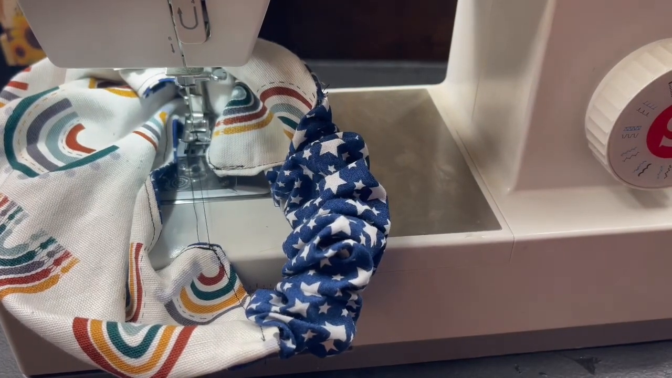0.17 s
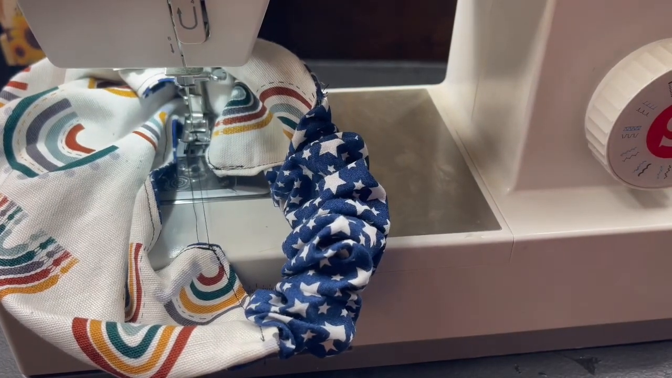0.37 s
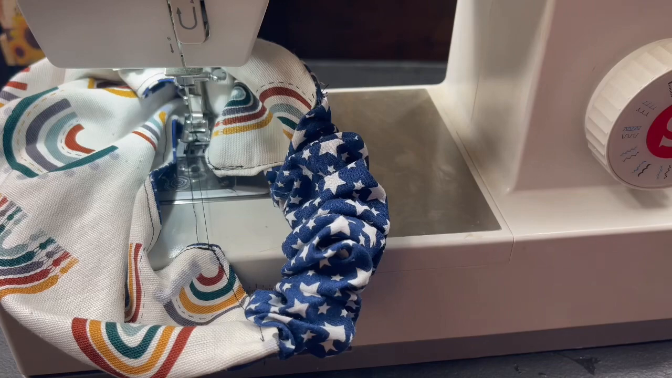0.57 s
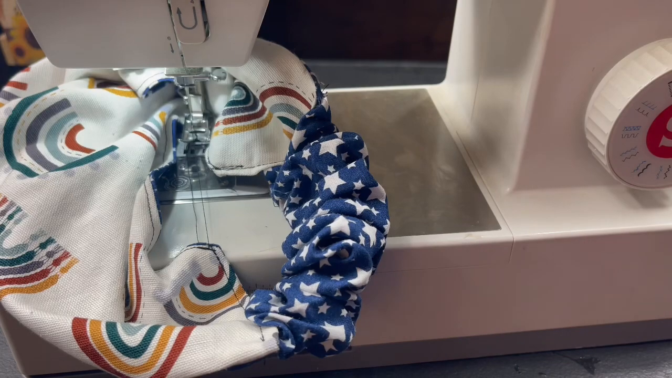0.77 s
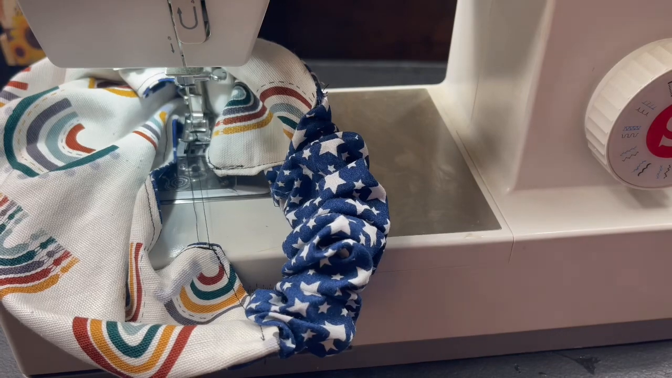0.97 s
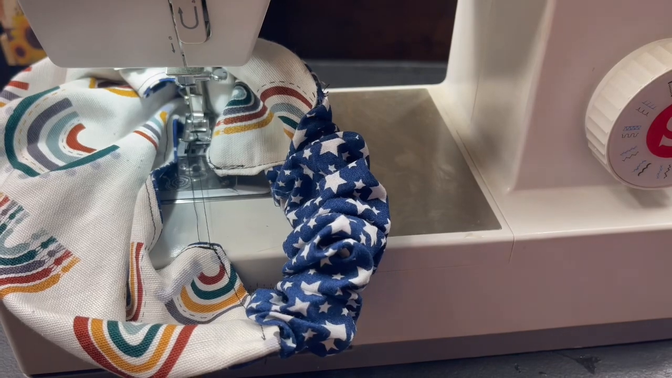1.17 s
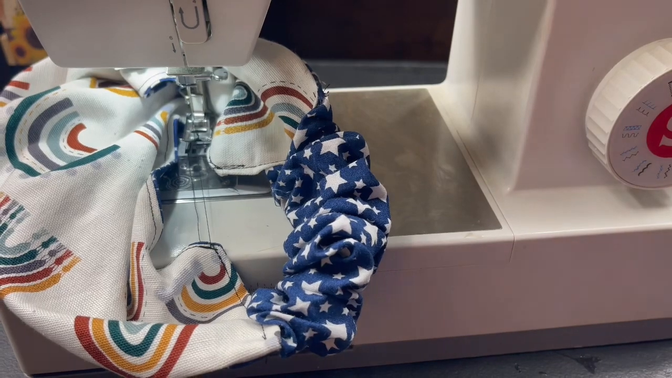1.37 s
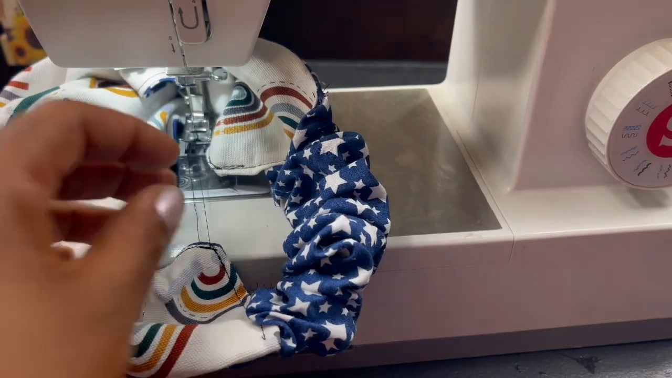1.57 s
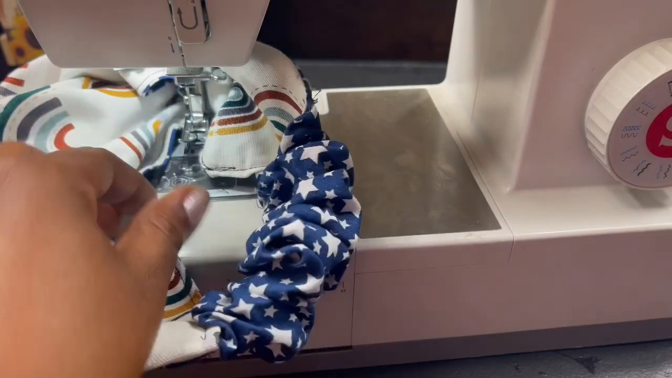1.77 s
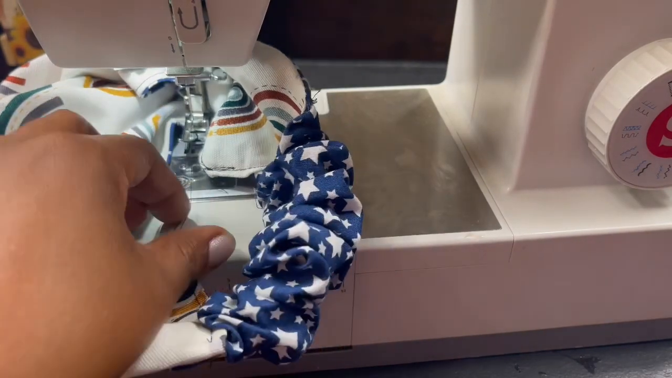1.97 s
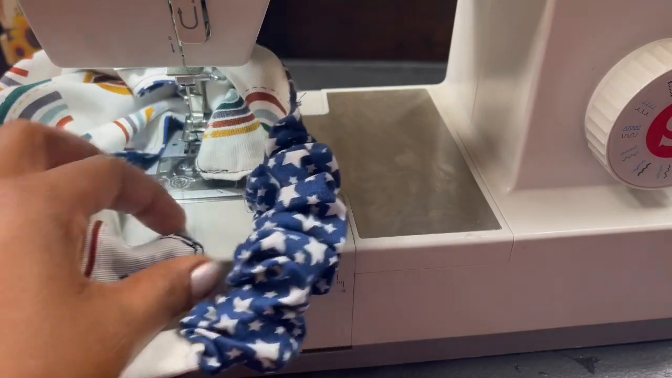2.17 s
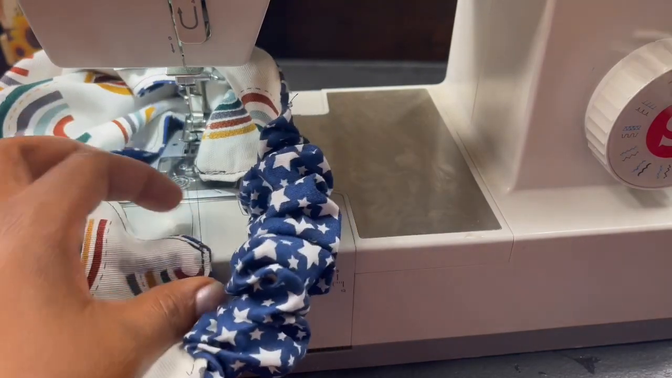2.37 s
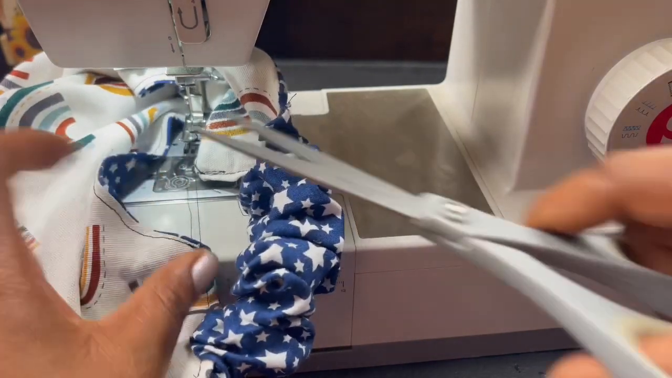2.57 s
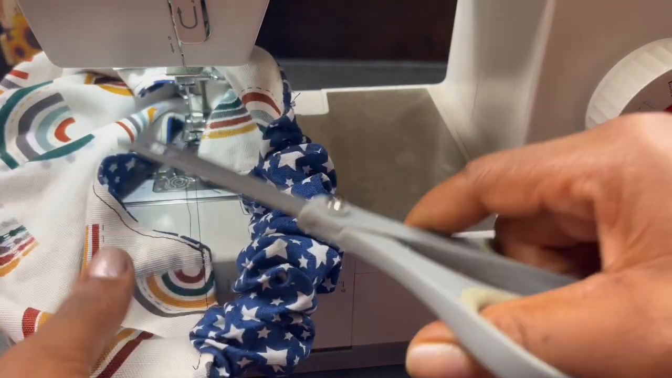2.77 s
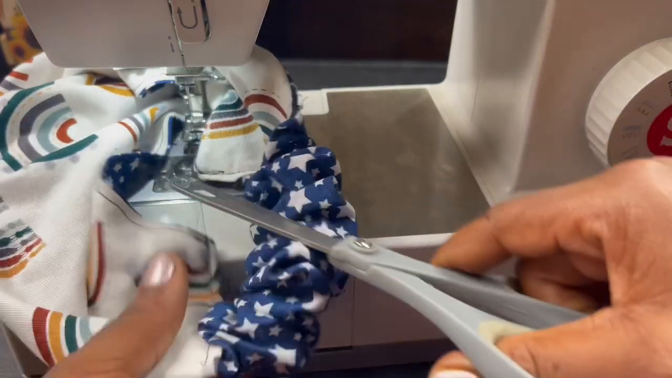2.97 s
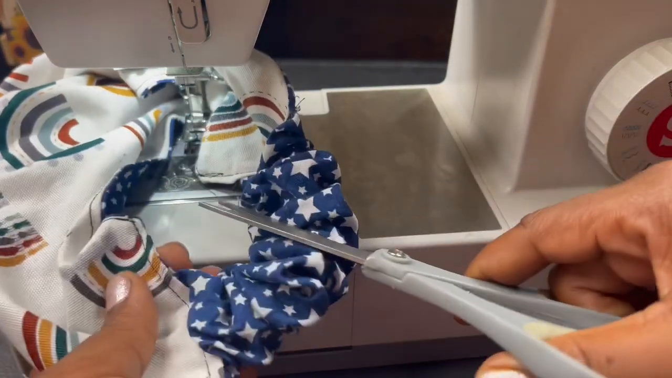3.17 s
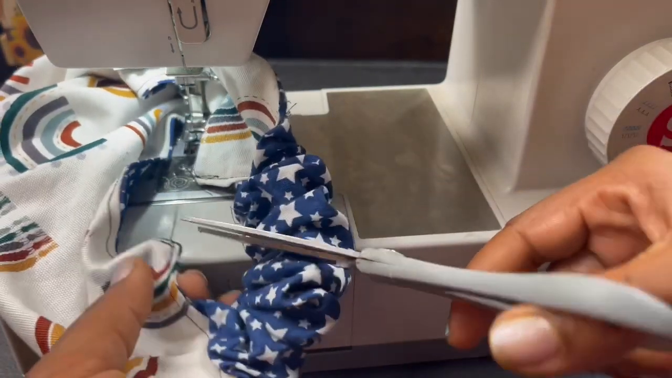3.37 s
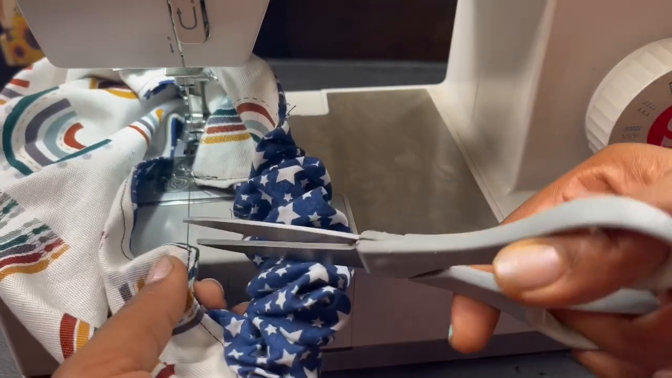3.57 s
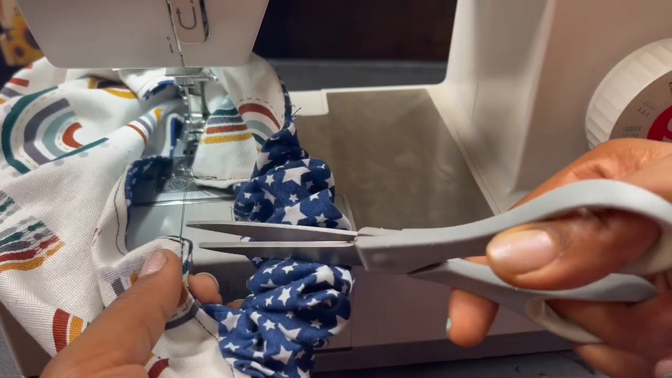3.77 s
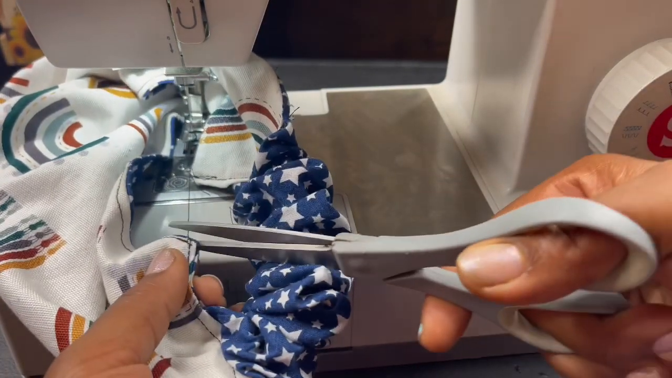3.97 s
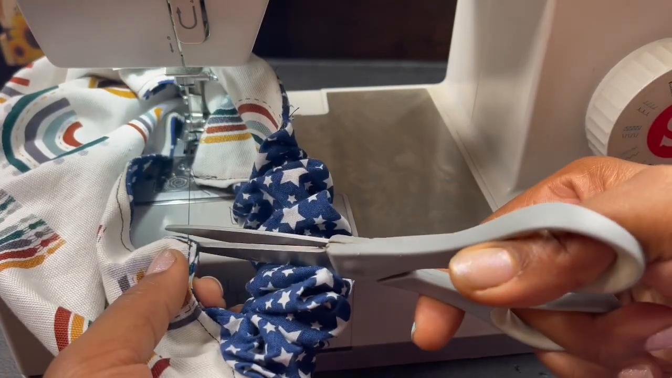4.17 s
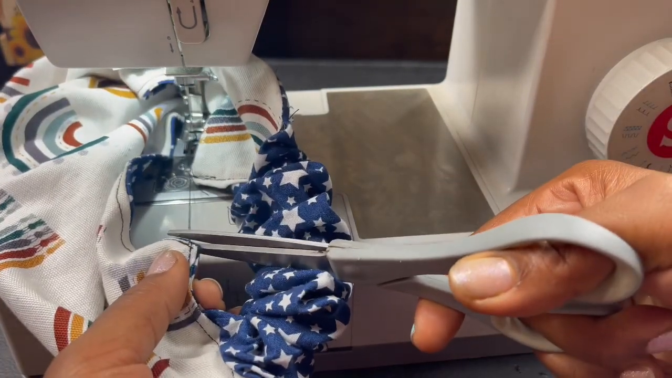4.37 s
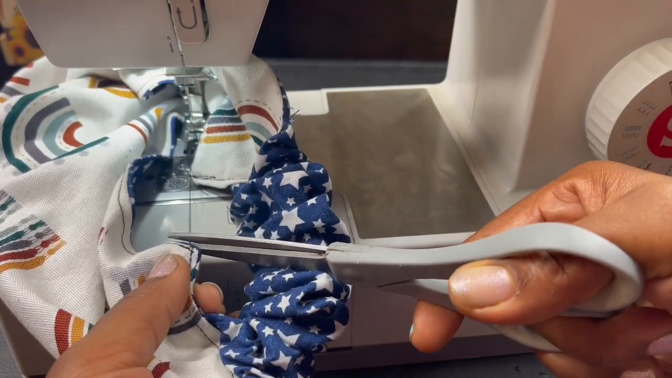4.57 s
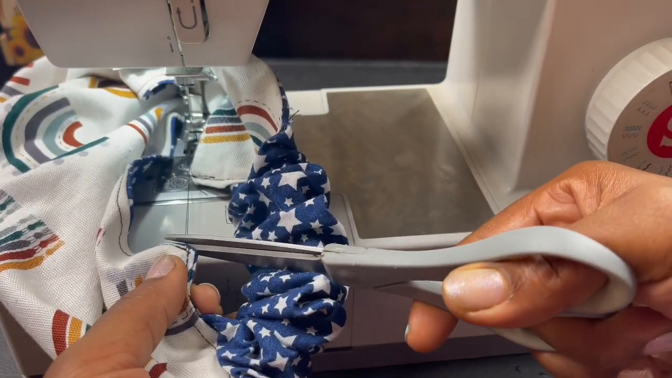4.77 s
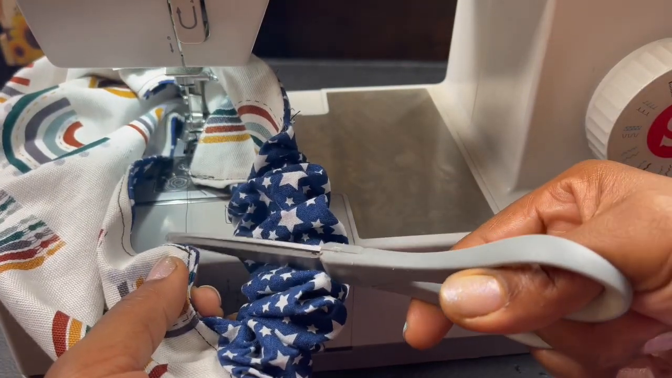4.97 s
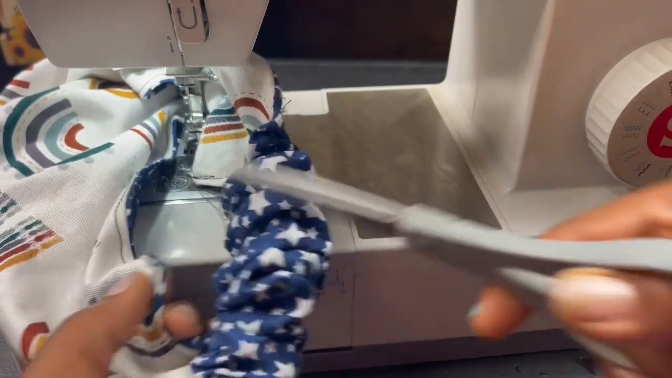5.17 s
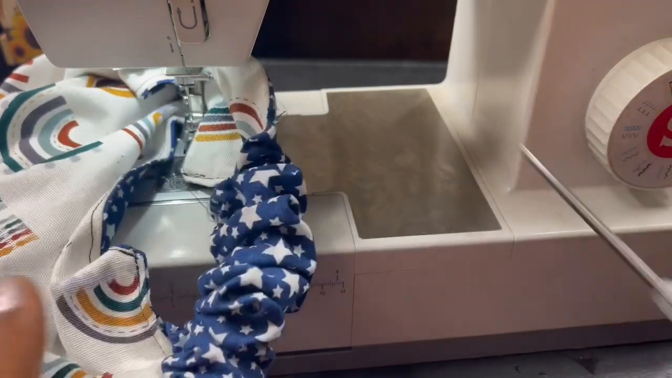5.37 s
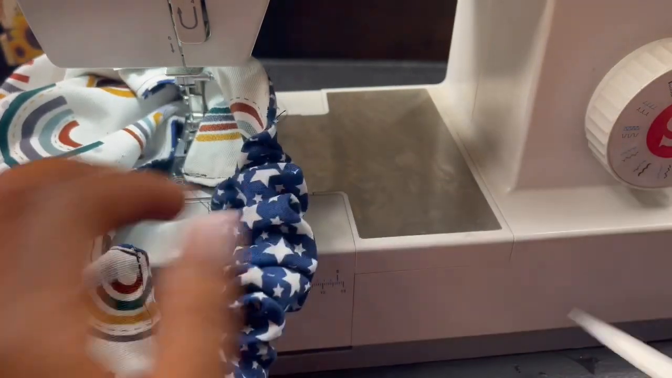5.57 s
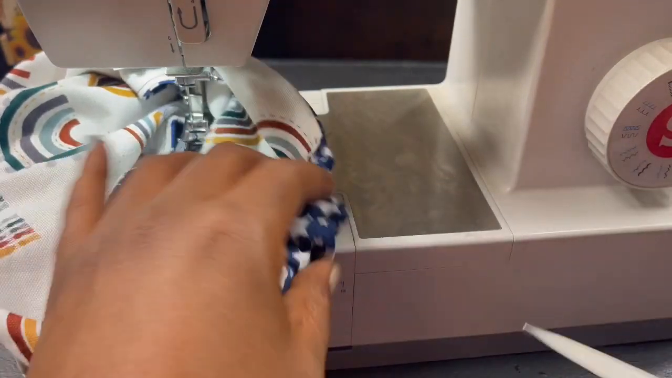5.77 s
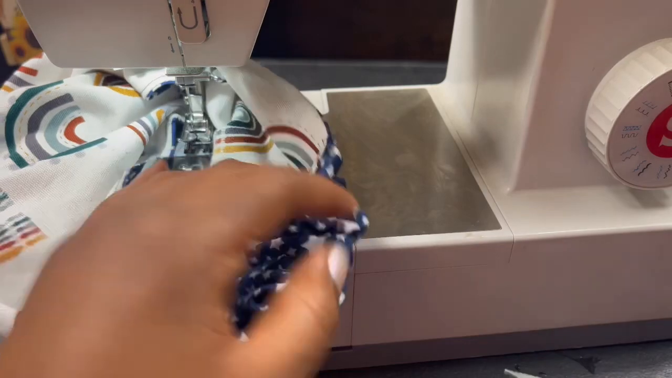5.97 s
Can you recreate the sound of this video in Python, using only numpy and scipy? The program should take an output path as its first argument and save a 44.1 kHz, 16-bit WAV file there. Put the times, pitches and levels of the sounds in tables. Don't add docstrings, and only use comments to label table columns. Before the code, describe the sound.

Cloth rustles and bumps, a sewing machine motor drones briefly, gears tick down, scissors ring open, snip crisply and land hard on the table.

```python
import sys
import numpy as np
from scipy import signal
from scipy.fft import rfft, irfft
from scipy.io import wavfile
from scipy.ndimage import uniform_filter1d

SR = 44100
rng = np.random.default_rng(int(sys.argv[2]) if len(sys.argv) > 2 else 0)


def file_out(sig):
    cols = np.atleast_2d(sig).T
    lim = np.clip(cols, -1, 1)
    pcm = np.round(lim * 32767).astype(np.int16)
    wavfile.write(sys.argv[1], SR, pcm)


def voltage_ratio(level):
    return 10 ** (np.asarray(level, float) / 20)


N = 264936

# pitch_hz, width_hz, level_db
HOUSING = [(51, 10, -10), (154, 51, -8), (207, 22, -1.5), (256, 26, -2), (353, 24, -2), (384, 29, -4.5),
           (427.5, 45, -5.5), (540, 43, -7)]
# pitch_hz, width_hz, level_db
FOOT = [(244, 116, 10), (540, 510, -1), (1094, 100, 3.5), (1913, 21, 8), (2520, 100, -0.5), (5060, 230, 6),
        (6000, 370, -10), (8640, 820, 7), (10900, 2100, -6)]
# pitch_hz, width_hz, level_db
BLADES = [(1350, 450, -9), (2243, 410, 6.5), (3560, 420, -13.5), (4600, 200, -16), (6540, 470, -24),
          (8430, 210, 6), (9730, 230, 9), (10720, 1180, 3.5), (13360, 210, -13), (14770, 650, -17)]


def evened(x):
    return x / np.sqrt(np.mean(x ** 2) + 1e-20)


def read(points, hz):
    f, value = np.transpose(points)
    return np.interp(np.log(hz + 1), np.log(f + 1), value)


def band(x, lo_hz, hi_hz):
    return signal.sosfilt(signal.butter(2, [lo_hz, hi_hz], "band", fs=SR, output="sos"), x)


def ring(x, peaks, widen=0.75):
    out = np.zeros(len(x))
    for k, (hz, width, db) in enumerate(peaks):
        sharpness = hz / max(width * widen, 8)
        out += (-1) ** k * voltage_ratio(db) * signal.lfilter(*signal.iirpeak(hz, sharpness, SR), x)
    return out


def coloured(x, points):
    return evened(irfft(rfft(x) * voltage_ratio(read(points, np.fft.rfftfreq(N, 1 / SR))), N))


def levelled(burst):
    z = rfft(burst)
    smooth = np.sqrt(uniform_filter1d(abs(z) ** 2, size=max(len(z) // 150, 1)) + 1e-12)
    return irfft(z / smooth, len(burst)) * np.linalg.norm(burst)


def blows(rows, pan_db, peaks, rise_s, contact_s, scatter=.12, raw_db=-18, top_hz=12500):
    out = np.zeros((2, N + SR))
    t = np.arange(SR // 2) / SR - .008
    after = np.maximum(t, 0)
    bite = np.arange(len(t)) == np.argmax(t >= 0)
    side = np.array([[.5], [-.5]]) * pan_db
    for s, clack_db, thump_db, tick_db, t60 in rows:
        fading = voltage_ratio(-60 * after / t60)
        contact = np.where(t < 0, np.exp(t / rise_s), np.exp(-after / contact_s) + scatter * fading)
        contact = contact * rng.standard_normal(len(t)) + 2.0 * bite
        contact = levelled(contact) * np.minimum(np.exp(t / rise_s / 2), 1)
        rung = ring(contact, peaks, 0.99) + voltage_ratio(raw_db) * contact
        thump = band(rung, 120, 705)
        clack = band(rung, 619, 4940)
        tick = band(band(rung, 3670, top_hz), 3750, top_hz) * fading
        levels_db = (clack_db + thump_db + 9, clack_db, clack_db + tick_db + 9)
        sound = 0
        for db, lean, part in zip(levels_db, (.3, 1, .3), (thump, clack, tick)):
            sound = sound + voltage_ratio(db + lean * side) * part / abs(part).max()
        at = max(round((s + t[0] + rise_s) * SR), 0)
        out[:, at:at + len(t)] += sound
    return out[:, :N]


def distant(points, level_db, patchy_db):
    # pitch_hz, likeness (0 to 1)
    far_same = [(60, .92), (600, .92), (1200, .5), (4500, .52), (8500, .8), (11300, .65), (12500, .95)]
    # pitch_hz, left_minus_right_db
    far_tilt = [(60, 1), (180, 2), (550, 5), (1650, 5), (4970, 7), (15000, -1.5)]
    frames, hz = N // 512 + 5, np.fft.rfftfreq(2048, 1 / SR)
    a, b, c, d, patches = rng.standard_normal((frames, 1025, 5)).T
    patches = evened(uniform_filter1d(uniform_filter1d(patches, 8, 0), 6, 1))
    same = np.clip(read(far_same, hz), 0, 1)[:, None]
    left = a + 1j * b
    right = same * left + np.sqrt(1 - same ** 2) * (c + 1j * d)
    lean = voltage_ratio(read(far_tilt, hz) / 2)[:, None]
    z = np.array([left * lean, right / lean]) * voltage_ratio(read(points, hz)[:, None] + patchy_db * patches)
    return voltage_ratio(level_db) * evened(signal.istft(z, nperseg=2048, noverlap=1536)[1][:, :N])


def rumble():
    # pitch_hz, level_db (per Hz)
    low_tone = [(21, -33), (36, 1), (54, -4.5), (70, -16), (89, -18.5), (108, 1.5), (141, -11.5), (238, -7),
                (266, -31), (307, -13.5), (408, -26.5), (479, -25), (848, -27.5), (1410, -67.5),
                (1600, -63), (2080, -79), (3520, -120)]
    # pitch_hz, level_db (per Hz)
    mic_hiss = [(760, -20), (1300, -2.5), (1570, -7.5), (1800, -6.5), (3910, -16), (10100, -12.5),
                (11300, -4), (12800, -17.5), (16600, -31), (22000, -120)]
    return distant(low_tone, -53, 1.2) + distant(mic_hiss, -80.5, 1.4)


def fibres(per_s, spread_db, wash):
    snaps = voltage_ratio(spread_db * np.minimum(rng.exponential(1, N), 5)) * (rng.random(N) < per_s / SR)
    return evened(snaps * rng.choice([-1., 1.], N)) + wash * rng.standard_normal(N)


def stroke(s, swell_s, fade_s, db):
    t = np.arange(N) / SR - s
    return voltage_ratio(db - 25 * np.where(t < 0, -t / max(swell_s, .003), t / max(fade_s, .003)))


def hands():
    # pitch_hz, level_db (per Hz)
    rustle_colour = [(2060, -37.5), (3500, -15.5), (5960, -13.5), (8520, -6), (9560, -2.5), (10100, 7.5),
                     (11300, -4), (12800, -33), (13000, -68)]
    # pitch_hz, level_db (per Hz)
    rub_colour = [(530, -55), (900, -15.5), (1430, -16.5), (1750, -18.5), (1900, -19.5), (2220, -14),
                  (5500, -19), (7150, -43), (12100, -120)]
    # pitch_hz, width_hz, level_db
    drag_peaks = [(158, 12, 11.5), (257, 79, 1.5), (484, 38.6, -5.5), (565.5, 17, -7), (687, 43, -10.5),
                  (890, 570, -22.5)]
    # peak_s, swell_s, fade_s, rustle_db, rub_against_rustle_db
    pushes = [(0.008, 0.012, 0.14, -62, 3), (0.055, .004, 0.11, -69, 5.5), (0.175, 0.016, 0.12, -64, -8),
              (0.281, 0.0088, 0.15, -67, -8), (0.36, 0.015, 0.52, -89, 16.5), (0.53, 0.075, .13, -44, -8.5),
              (1.438, 0.025, 0.049, -64.5, 7), (1.7, 0.34, 0.3, -62, -14), (2.118, 0.56, 0.11, -62, -7.5),
              (2.3, 0.074, 0.31, -66, -13.5), (2.47, 0.092, 0.036, -70.5, -7),
              (2.92, 0.069, 0.25, -74.5, -4.5), (3.06, 0.14, 0.15, -63.5, -9.5),
              (3.344, 0.15, 0.081, -61.5, -4.5), (5.33, 0.57, 0.067, -67, -9),
              (5.5, 0.083, .15, -60.5, 2.2), (5.796, 0.13, 0.22, -58.5, -5.5), (5.95, 0.24, .5, -68, -11)]
    # peak_s, swell_s, fade_s, level_db
    pulls = [(0.0, .01, 0.38, -48), (0.53, 0.19, 0.25, -54.5), (1.45, 0.037, 0.071, -39.5),
             (1.7, 1, 0.66, -54.5), (2.1, 0.51, 0.42, -63.5), (2.55, 0.36, 0.39, -84),
             (3.034, 0.089, 0.4, -62), (3.344, 0.31, 1, -60.5), (3.6, .6, 0.15, -57.5),
             (3.986, 0.23, 0.71, -60), (4.73, 0.04, 0.83, -61.5), (5.23, 0.23, 0.24, -55.5),
             (5.52, 0.23, 0.29, -44), (5.902, 0.11, 0.21, -55)]
    rustle = coloured(fibres(3000, 4.6, 3.0), rustle_colour)
    rub = coloured(fibres(1500, 1.8, 0.77), rub_colour)
    drag = evened(band(ring(fibres(301, 1.07, 1.22), drag_peaks), 211, 1050))
    fine = sum(stroke(*row[:4]) for row in pushes)
    coarse = sum(stroke(*row[:4]) * voltage_ratio(row[4]) for row in pushes)
    return fine * rustle + coarse * rub + sum(stroke(*row) for row in pulls) * drag


def cloth_knocks():
    # start_s, force_db, thump_against_force_db, bright_against_force_db, ring_t60_s
    knocks = [(0.051, -42, -2.5, -10.5, 0.0092), (0.156, -69.5, 19, -17, 0.033),
              (0.175, -53.5, 1, -7, 0.026), (0.263, -71.5, 22, -16, 0.062), (0.347, -56, -1.5, -26, 0.035),
              (0.445, -53, -26, -14, 0.11), (0.485, -37.5, -15, -13.5, 0.17), (0.545, -37, -19, -8, 0.079),
              (1.525, -47, 3, -10.5, 0.023), (1.74, -51.5, -5, 0, 0.042), (5.645, -54.5, -1.5, -26, 0.03),
              (5.822, -49.5, -8, -9.5, 0.064)]
    return blows(knocks, 4.0, FOOT, 0.00068, 0.013, 0.096, -3.5, 11400)


def narrow_sounds():
    # start_s, length_s, pitch_hz, width_hz, level_db
    narrow_rows = [(0.441, 0.097, 1370, 2400, -53.5), (1.18, 0.91, 987, 250, -59.5),
                   (1.992, 0.016, 540, 250, -39), (3.3, 0.035, 4660, 1200, -65), (5.825, .02, 780, 170, -52),
                   (2.81, 0.077, 4900, 910, -83.5), (3.21, .085, 4560, 800, -74), (3.215, .07, 2900, 400, -81),
                   (3.3, 0.063, 8800, 900, -71), (4.82, 0.047, 1220, 45, -57.5),
                   (4.874, 0.015, 11200, 620, -46), (4.876, .013, 2300, 270, -42.5),
                   (4.877, .01, 3370, 330, -49.5), (3.367, 0.015, 760, 730, -48), (3.04, .07, 2840, 1600, -62),
                   (.494, .013, 480, 160, -42), (.553, 0.021, 494, 150, -44), (.482, 0.02, 1910, 220, -49),
                   (.466, 0.015, 1550, 200, -55), (5.85, .16, 99, 37, -51.5), (5.15, .08, 185, 40, -52),
                   (4.812, 0.021, 870, 500, -54), (5.439, .01, 560, 200, -33), (3.4, 0.2, 800, 500, -60),
                   (5.124, 0.18, 475, 150, -53), (5.506, 0.022, 880, 100, -44), (0.542, 0.014, 1930, 82, -41),
                   (0.446, 0.16, 483, 290, -53.5), (1.4, .12, 49, 54, -47.5), (5.5, 0.27, 86, 35, -50.5)]
    t, out = np.arange(N) / SR, np.zeros(N)
    for s, length, hz, width, db in narrow_rows:
        swell = np.sin(np.pi * np.clip((t - s) / length, 0, 1))
        once = ring(rng.standard_normal(N), [(hz, width, 0)])
        twice = swell * ring(once, [(hz, 2 * width, 0)])
        out += voltage_ratio(db) * twice * np.linalg.norm(swell) / np.linalg.norm(twice)
    return out


def motor():
    # time_s, drone_db
    effort = [
        (0.725, -50),
        (0.745, -44),
        (0.775, -42),
        (0.861, -42.5),
        (0.96, -42.5),
        (1.14, -38.5),
        (1.168, -54),
        (1.188, -38.5),
        (1.209, -64),
    ]
    # time_s, knocks_per_s
    pace = [
        (.725, 51.9),
        (.99, 51.9),
        (1.02, 50.9),
        (1.21, 50.8),
    ]
    # start_s, boost_db
    jolts = [
        (0.764, 5.5),
        (.938, 5.5),
        (1.015, 2),
        (1.075, 4),
        (1.133, 2),
    ]
    # pitch_hz, width_hz, level_db
    gear_peaks = [(771, 33, 8), (970, 35, 5), (1015, 38, 4.5), (1100, 60, 3), (1320, 130, -2.5),
                  (1650, 78, -2.5), (2100, 480, -6), (2520, 430, -6.5), (3270, 300, -12), (4350, 200, -26)]
    loose_peaks = [(4250, 600, 3), (5160, 780, -6), (6800, 1200, -8.5), (8800, 600, -4)]  # Hz, width Hz, dB
    uneven = 0.36
    s, effort_db = np.transpose(effort)
    t = np.arange(N) / SR
    drone_db, since = np.interp(t, s, effort_db), np.clip(t - s[0], 0, 1)
    slack_db = np.minimum(drone_db + 42, 0)
    clatter_db = -53.5 + 0.49 * slack_db - 4.5 * since
    rattle_db = -69 + slack_db - 55 * since

    on = (t >= s[0]) & (t < s[-1])
    turns = np.cumsum(np.interp(t, *np.transpose(pace)) * on) / SR
    cycle = turns.astype(int)
    luck = rng.standard_normal((60, 2))[cycle]
    knocks = (np.diff(cycle, prepend=-1) > 0) * on + (np.diff(on, prepend=False) & on)
    noise = rng.standard_normal((2, N))
    puffs = on * (.2 + np.exp(-(turns % 1) / .25))
    drive = (1 - uneven) * evened(knocks * voltage_ratio(0.99 * luck[:, 0])) + uneven * evened(puffs * noise[0])
    drone = band(ring(drive, HOUSING), 35, 503)
    drone /= np.sqrt(uniform_filter1d(drone ** 2, 2600) + 1e-9)

    strike = rng.standard_normal(700) * np.exp(-np.arange(700) / (0.0048 * SR))
    jolt_db = sum(db * (t >= at) * np.exp(-abs(t - at) / .04) for at, db in jolts)
    shaken = (0.99 * puffs + .1 * on) * noise[1] + np.convolve(knocks, levelled(strike))[:N]
    shaken = shaken * voltage_ratio(.6 * luck[:, 1] + jolt_db)
    clatter = band(ring(shaken, gear_peaks, 1.26), 650, 4360)
    rattle = ring(band(shaken, 3200, 9600), loose_peaks)
    gears = voltage_ratio(clatter_db) * evened(clatter) + voltage_ratio(rattle_db) * evened(rattle)
    return on * voltage_ratio(drone_db) * drone + np.sqrt(on.mean()) * gears


def coasting_gears():
    # start_s, force_db
    ticks = [(1.177, -36), (1.239, -35), (1.302, -37), (1.354, -39), (1.39, -38.5), (1.424, -29.5),
             (1.481, -44), (1.502, -46.5), (1.537, -29), (1.609, -42), (1.635, -47.5), (1.697, -40.5),
             (1.787, -48.5), (1.813, -38), (1.857, -46), (1.913, -45)]
    # thump_db, bright_db, ring_t60_s
    every_tick = (-4.5, -54, .125)
    # pitch_hz, width_hz, level_db
    body = [(799, 145, -3), (867, 227, 4), (1020.5, 127, 8.5), (1103, 36, 8), (1230, 54, 5),
            (1554, 123, -4.5), (2130, 145, -8.5), (2610, 190, -9), (3390, 140, -17), (4180, 50, -23),
            (8500, 600, -31)]
    rows = [(*row, *every_tick) for row in ticks]
    return blows(rows, 4.4, HOUSING[1:] + body, .0006, 0.001, 0.24, -41.0, 11100)


def foot_taps():
    # start_s, force_db, thump_against_force_db, bright_against_force_db, ring_t60_s
    taps = [
        (1.995, -39.5, -12, -15.5, 0.064),
        (2.636, -60.5, -27, -13, 0.03),
        (5.571, -46.5, -0.5, -16, 0.025),
        (5.617, -60.5, 9.5, -19.5, 0.031),
        (5.9, -50, -3, -18, 0.03),
        (5.977, -48, -27, -26, 0.03),
    ]
    return blows(taps, 6.6, FOOT, 0.0003, 0.0021, .1, 1.0)


def scissors_open():
    # start_s, force_db, thump_against_force_db, bright_against_force_db, ring_t60_s
    opening = [
        (2.293, -52, -26, 18.8, 0.13),
    ]
    return blows(opening, 4.0, BLADES, 0.00055, 0.004, 0.9, -12.0, 22000)


def plate_touches():
    # start_s, force_db, ring_t60_s
    contacts = [
        (3.039, -19, 0.024),
        (3.199, -55, .05),
        (3.371, -34.5, 0.084),
        (3.406, -50, 0.31),
        (3.48, -53.5, 0.19),
    ]
    # thump_db, bright_db (of a hard one)
    tip = (-8.5, -27)
    # pitch_hz, width_hz, level_db
    plate = [(158, 12.6, 6.5), (247, 20, 1), (325, 47, 4.5), (523, 107, 3.5), (660, 55, 4.5), (938, 83, -9),
             (1385, 79, -8.5), (2440, 144, -15), (2800, 550, -25), (4570, 170, -25.5), (9460, 1000, -25),
             (11500, 290, -45)]
    rows = [(s, db, tip[0], tip[1] + 0.8 * (db + 17), t60) for s, db, t60 in contacts]
    return blows(rows, 4.7, plate, 0.0006, 0.0024, 0.19, -33)


def blades_meet():
    # start_s, force_db, thump_against_force_db, bright_against_force_db, ring_t60_s
    meeting = [
        (4.681, -50.5, -42, -19, .012),
    ]
    # pitch_hz, width_hz, level_db
    edges = [(2070, 330, 0), (3180, 600, -26), (8550, 900, -8), (11500, 500, -18)]
    return blows(meeting, 3.5, edges, .0005, .0015, .1, -30)


def thread_snips():
    # start_s, force_db, thump_against_force_db, bright_against_force_db, ring_t60_s
    closings = [
        (4.81, -33, -58, -3, 0.0033),
        (4.879, -26.5, -22.5, -8, 0.01),
    ]
    return blows(closings, 3.0, BLADES, .002, 0.0018, 0.082, -6.5, 16500)


def scissors_drop():
    # start_s, force_db, thump_against_force_db, bright_against_force_db, ring_t60_s
    landing = [
        (5.435, -9, -15, -6, 0.025),
    ]
    # pitch_hz, width_hz, level_db
    wood = [(248, 21, -0.5), (365, 46, -3), (537, 38, 9), (775, 90, 0), (880, 69, -3.5), (1232, 70, 5),
            (1420, 70, 0), (1525, 60, -1), (2007, 68, -5.5), (2340, 100, -6.5), (2896, 123, -8.5),
            (3330, 180, -9), (4520, 450, -10.5), (5400, 500, -8), (6300, 55, -6), (7940, 160, -4.5),
            (10770, 570, -3.5), (15500, 400, -40)]
    return blows(landing, 2.8, wood, 0.00022, 0.00078, 0.24, -27.0, 16000)


def room(x):
    # pitch_hz, t60_s
    fade_times = [(150, 0.24), (600, 0.23), (2500, 0.14), (9000, 0.19)]
    taps = np.zeros((2, SR // 2))
    at = np.arange(300, SR // 2 - 20, 20) + rng.integers(0, 20, (2, (SR // 2 - 301) // 20))
    np.put_along_axis(taps, at, rng.choice([-1., 1.], at.shape), 1)
    hz, t, z = signal.stft(taps, SR, nperseg=256)
    tail = signal.istft(z * voltage_ratio(-60 * t / read(fade_times, hz)[:, None]), SR, nperseg=256)[1]
    tail = .8 * tail.mean(0) + .5 * tail
    return signal.fftconvolve(x.mean(0)[None], tail / np.linalg.norm(tail[0]), axes=1)[:, :N]


def ports(x, nearby_db):
    # pitch_hz, left_leads_radians
    near_turn = [(0, 0), (1980, -0.2), (2840, 1.0), (6720, 0.2), (7750, 0.9), (8870, -0.4), (9730, -2.7),
                 (10500, -3.3), (11600, -6.1), (12500, -6.5), (13200, -8.9), (14000, -9.4), (15100, -12.5),
                 (16300, -12.2)]
    hz = np.fft.rfftfreq(N, 1 / SR)
    lean = np.exp(.5j * np.interp(hz, *np.transpose(near_turn)))
    bounce = levelled(rng.standard_normal(1024)) * np.exp(-np.arange(1024) / (.007 * SR))
    unlike = signal.oaconvolve(x.mean(0), bounce / np.linalg.norm(bounce))[:N]
    unlike = band(band(unlike, 420, 9000), 300, 9000)
    both = x + voltage_ratio(nearby_db) * np.array([unlike, -unlike])
    return irfft(rfft(both) * np.array([lean, 1 / lean]), N)


def scene():
    struck = cloth_knocks() + motor() + coasting_gears() + foot_taps() + plate_touches() + scissors_drop()
    snips = narrow_sounds() + scissors_open() + blades_meet() + thread_snips()
    to_walls = voltage_ratio(-8.5) * band(struck, 28, 5980) + voltage_ratio(-16) * band(band(snips, 28, 12000), 28, 12000)
    near = struck + snips + hands() + room(to_walls)
    return ports(near, -8) + ports(rumble(), -99)


def low_pass(x):
    return signal.sosfilt(signal.butter(12, 16710, fs=SR, output="sos"), x)


def record(dry):
    cut = signal.sosfilt(signal.butter(10, 37, "high", fs=SR, output="sos"), dry)
    dip = signal.lfilter(*signal.iirnotch(10250, 11.5, SR), cut)
    for hz in (13600, 14400):
        dip = .45 * dip + .55 * signal.lfilter(*signal.iirnotch(hz, 7.5, SR), dip)
    mix = signal.sosfilt(signal.butter(4, 13200, fs=SR, output="sos"), dip)
    return low_pass(mix)


dry = scene()
out = record(dry)
file_out(out)
```